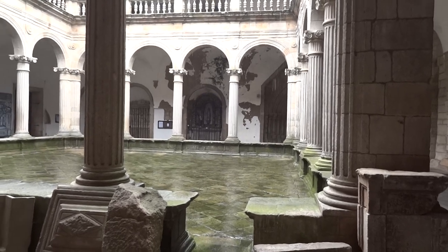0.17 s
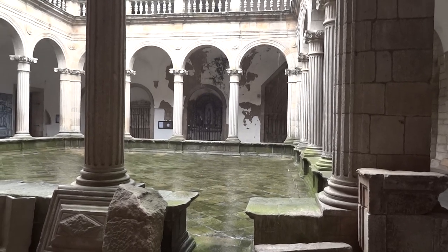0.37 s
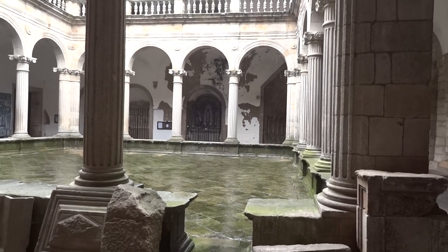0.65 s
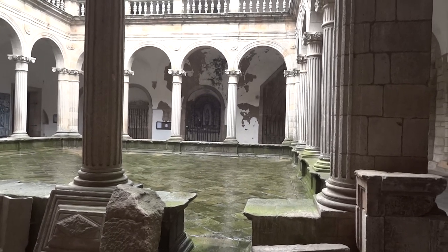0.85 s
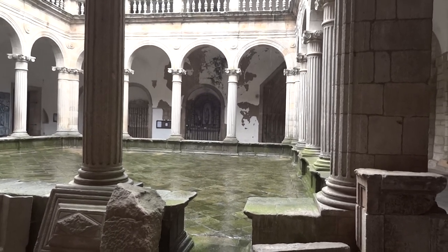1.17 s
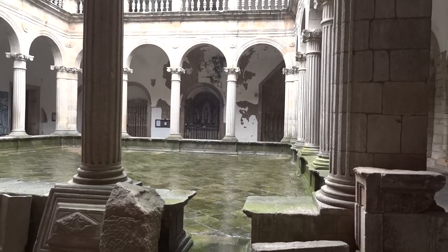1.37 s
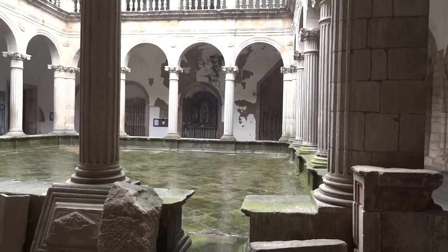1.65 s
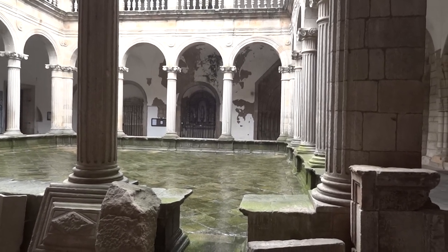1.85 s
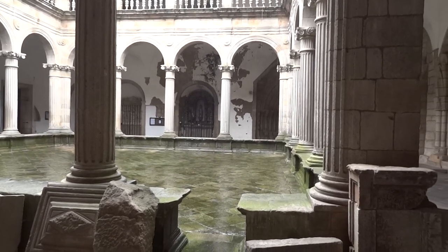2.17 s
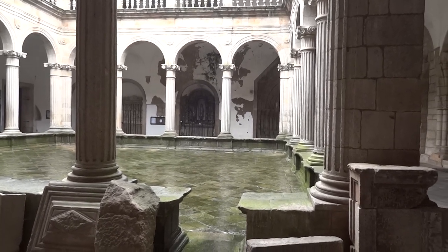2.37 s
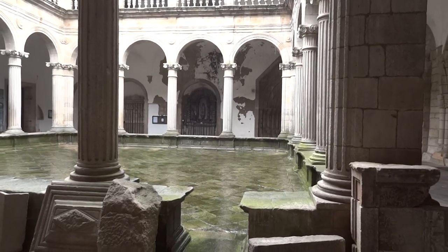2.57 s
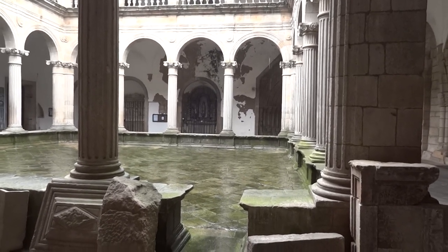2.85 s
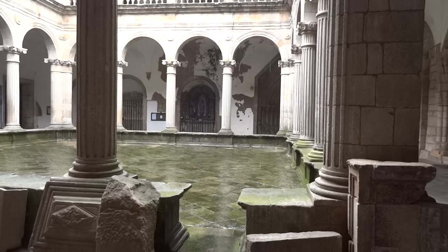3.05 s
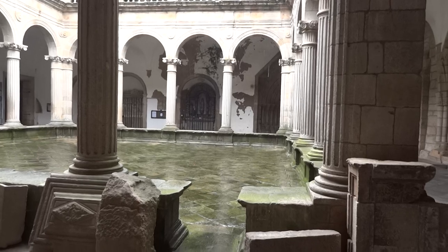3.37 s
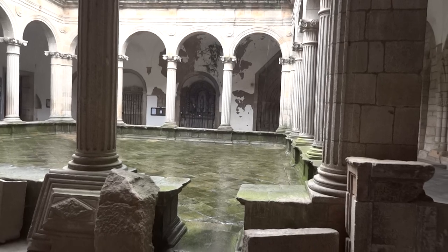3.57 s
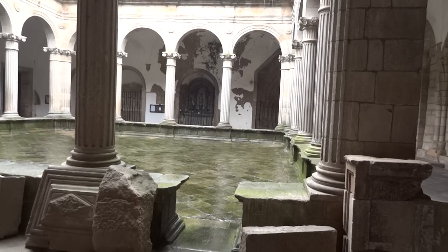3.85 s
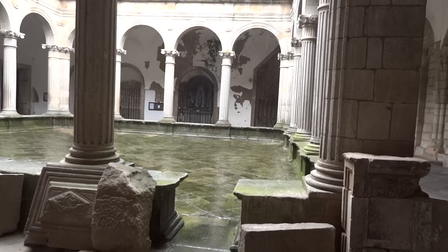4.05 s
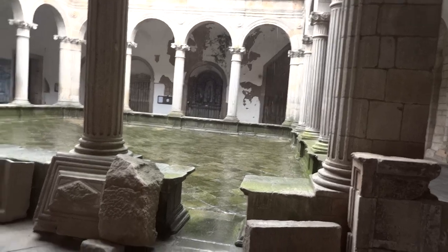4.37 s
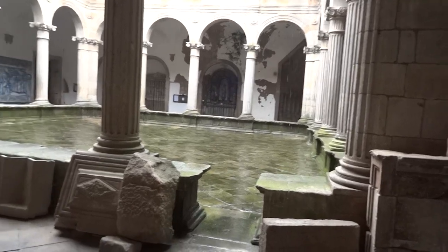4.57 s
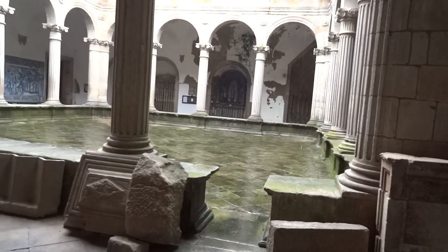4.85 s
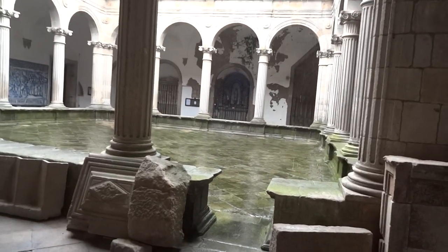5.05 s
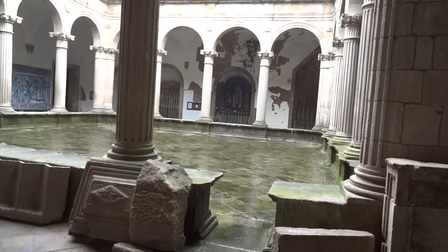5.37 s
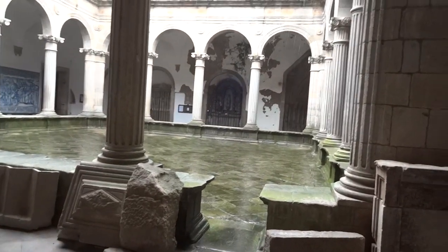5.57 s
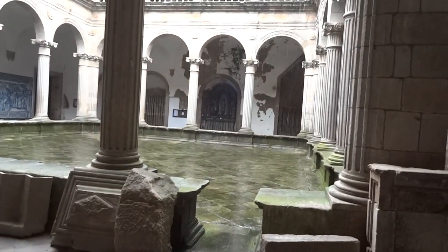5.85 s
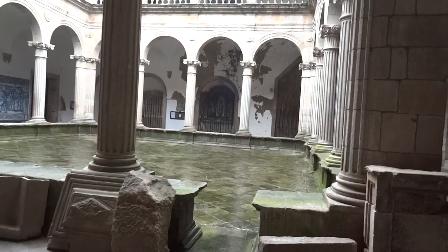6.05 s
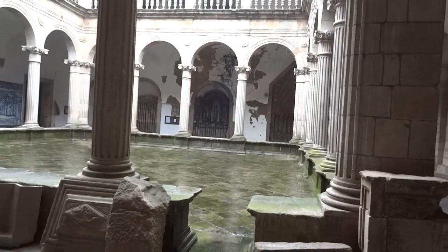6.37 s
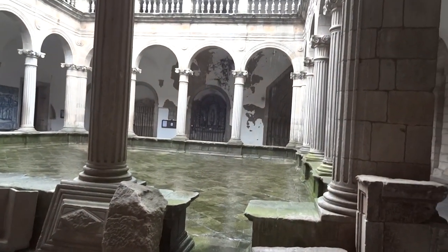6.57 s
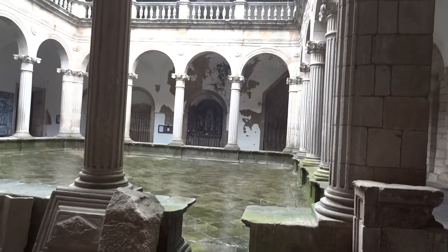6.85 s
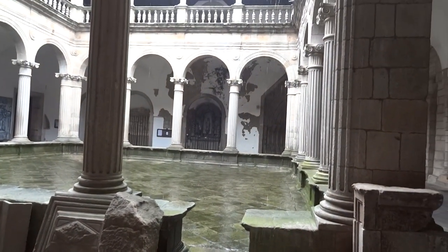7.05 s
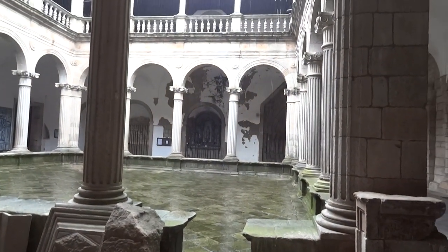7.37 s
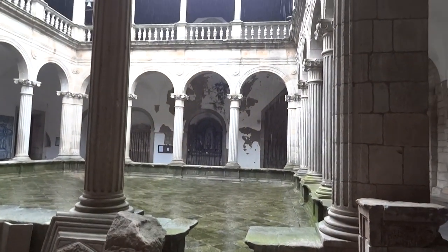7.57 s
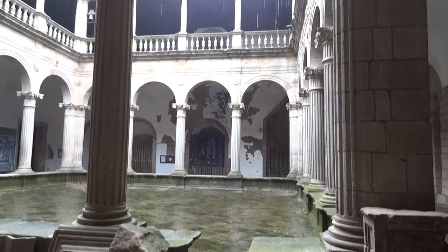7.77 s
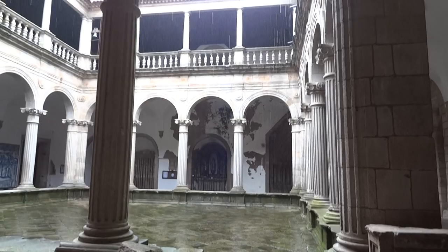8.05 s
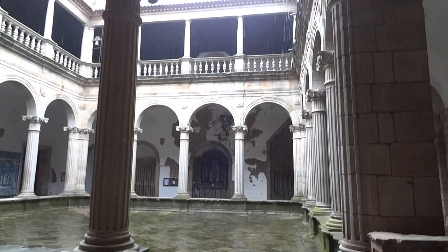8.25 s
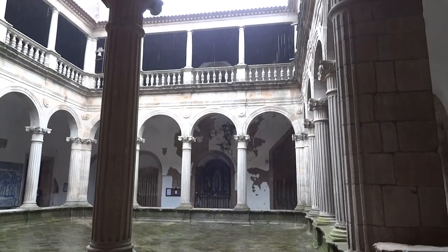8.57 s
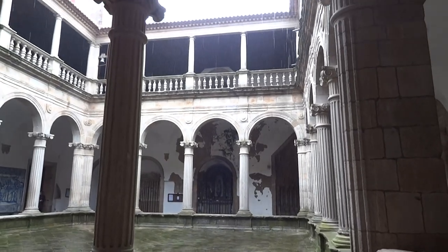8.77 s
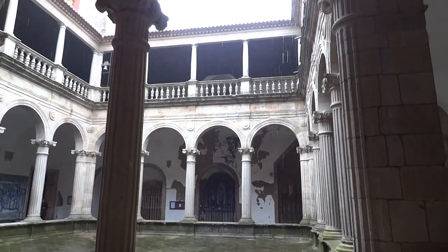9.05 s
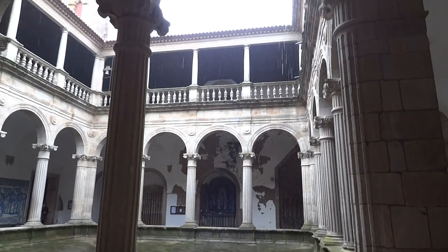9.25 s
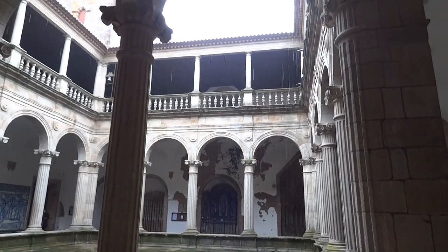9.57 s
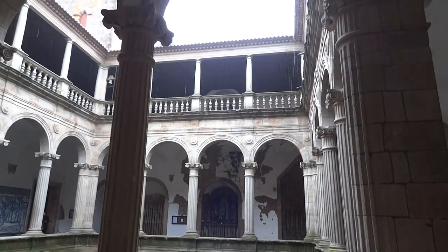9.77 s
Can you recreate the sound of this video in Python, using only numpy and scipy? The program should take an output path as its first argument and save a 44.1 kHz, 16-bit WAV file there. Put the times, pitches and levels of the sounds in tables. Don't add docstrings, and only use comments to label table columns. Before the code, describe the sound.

Steady rain on wet stone and shallow water, heard from under an arcade in a walled courtyard. Countless fine drops blur into a bright, even hiss that wavers slightly. Close drops tick and plop irregularly above it, and run-off from the eaves lands in short splashes, thickest in the first two seconds. A very quiet low hum lies beneath, with a few soft bumps on the handheld microphone midway.

```python
import sys
import numpy as np
from scipy import signal
from scipy.fft import rfft, irfft
from scipy.io import wavfile
from scipy.ndimage import map_coordinates

SR = 44100
rng = np.random.default_rng(int(sys.argv[2]) if len(sys.argv) > 2 else 0)


def wav_out(sig):
    wavfile.write(sys.argv[1], SR, np.round(np.clip(np.atleast_2d(sig).T, -1, 1) * 32767).astype(np.int16))


def volts_from_decibels(level):
    exponent = np.asarray(level, float) / 20
    return 10 ** exponent


N = 436590


def unit(x):
    return x / np.sqrt(np.mean(x ** 2) + 1e-20)


def along(points, hz):
    f, v = np.transpose(points)
    return np.interp(np.log(hz + 1), np.log(f + 1), v)


def coloured(x, gain_db):
    size = 4096
    log_gain = np.log(volts_from_decibels(gain_db(np.fft.rfftfreq(size, 1 / SR))) + 1e-6)
    cepstrum = irfft(log_gain, size)
    cepstrum[1:size // 2] *= 2
    cepstrum[size // 2 + 1:] = 0
    response = irfft(np.exp(rfft(cepstrum)), size)
    return signal.oaconvolve(x, response)[:N]


def wobble(rate):
    knots = rng.standard_normal(int(N * rate / SR) + 4)
    return map_coordinates(knots, [np.arange(N) * rate / SR])


def curves(rows):
    s, *cols = np.transpose(rows)
    return [np.interp(np.arange(N) / SR, s, c) for c in cols]


def swells(rows, half_s):
    s, rise_db = np.transpose(rows)
    t = np.arange(0, N + 256, 256) / SR
    bells = np.exp(-((t - s[:, None]) / half_s) ** 2)
    return np.interp(np.arange(N) / SR, t, rise_db @ bells)


def surges():
    # time [s], strength [dB], coarseness [dB], more big drops when high.
    shower = [(0, 0.5, -1.7), (.2, 0, 1), (.55, -.5, -1), (.95, -0.2, 0.45), (1.3, 0.35, -0.14),
              (1.9, 0, 0.65), (2.3, 0, -1.7), (2.62, 0, 1), (2.98, -1.5, 0.15), (3.45, 0.5, 0.59),
              (4.3, 0, .5), (4.65, -1, -0.39), (5.25, 0.5, -1.3), (6.8, -1.2, 0.74), (7.6, 0.2, -0.24),
              (8.25, -1.5, -0.43), (8.9, 0, 0.9), (9.9, -0.5, 1.8)]
    # time [s], strength change [dB].
    puffs = [(.3, -0.5), (.8, 0.7), (.99, -1.5), (1.5, 0.5), (2.1, 0.5), (2.25, -1.2), (2.4, -1.2),
             (3.12, .8), (3.4, 0), (3.95, -3), (4.1, -0.5), (4.44, -1.5), (4.84, 1), (5.03, -0.5), (5.7, 0),
             (5.93, -0.5), (6.2, 1.5), (6.35, -0.5), (6.5, 2.5), (7.2, -1), (7.4, 0.5), (7.57, -2),
             (7.77, -1), (7.92, 1), (8.3, 0.5), (8.42, 2), (8.63, -1.5), (9.12, -2.5), (9.3, -1),
             (9.45, 1.5)]
    # time [s], rise [dB].
    spray = [(.03, 2), (.22, 0.5), (.41, 1.5), (1.08, 1), (1.29, 1.5), (1.89, 0), (2.07, 1.5), (2.34, 1),
             (2.59, 1), (3.3, 1), (3.52, 0.5), (3.65, -3), (3.76, 1), (3.89, 1.5), (4.25, 0.5), (4.52, 1),
             (5.17, 2), (5.79, 0.5), (6.3, 1), (6.65, 2), (6.97, 1), (7.07, 1), (7.4, 1.5), (7.57, 3),
             (7.9, 1.5), (8.38, 2), (8.7, -2), (8.99, 0), (9.4, 0.5), (9.61, 0.5)]
    # level [dB], dB per strength dB, dB per coarseness dB.
    answer = [
        (-37, 0.67, 1.43),
        (-29.5, 1.25, 0.85),
        (-27.5, 2.5, 0.4),
        (-29, 0.96, 0.6),
        (-32.5, 0.34, 0.2),
    ]
    flurries_per_s = 18
    strength_db, coarse_db = curves(shower)
    strength_db = strength_db + 0.44 * swells(puffs, half_s=0.064)
    strength_db = strength_db + 0.07 * wobble(flurries_per_s)
    levels = []
    for db, per_strength, per_coarse in answer:
        flurry_db = 0.29 * wobble(flurries_per_s)
        levels.append(db + per_strength * strength_db + per_coarse * coarse_db + flurry_db)
    levels[-1] = levels[-1] + 1.55 * swells(spray, half_s=0.041)
    return levels


def impacts(scatter_db):
    per_second = 2500
    count = per_second * N // SR
    rank = np.minimum(rng.exponential(size=count), 4.5)
    size = volts_from_decibels(scatter_db * rank) * rng.choice([-1, 1], count)
    return unit(np.bincount(rng.integers(0, N, count), size, N))


def rain():
    # splash centre [Hz], spread [octaves], size scatter [dB],
    # share heard straight [0-1], gain [dB].
    sizes = [
        (1412, 0.36, -0.5, 0.23, 2.28),
        (2608, 0.23, 1.5, 0.27, 1),
        (4347, 0.25, 4, 0.3, 0.78),
        (7140, 0.23, 4.5, 0.46, 0.5),
        (11800, 0.3, 4.5, 0.38, 1.74),
    ]
    # frequency [Hz], density [dB per Hz].
    splash = [(400, -64), (700, -21.5), (1300, -14.5), (2500, -2), (4200, 4.5), (8000, -2.5), (13000, -8.5),
              (15000, -11), (16500, -17)]
    shared = impacts(scatter_db=4.0)
    clump = wobble(rate=30)
    ahead, sideways = np.zeros(N), np.zeros(N)
    for level_db, (centre_hz, octaves, scatter_db, straight, gain_db) in zip(surges(), sizes):

        def band(hz):
            octaves_off = np.abs(np.log2(np.clip(hz, 1, 12000) / centre_hz))
            return along(splash, hz) - 6 * (octaves_off / (2 * octaves)) ** 2.66

        hits = unit(impacts(scatter_db) + 0.6 * shared) * volts_from_decibels(0.51 * clump + 1.34 * wobble(rate=60))
        blur = rng.standard_normal(N) * volts_from_decibels(0.11 * wobble(rate=45))
        mix = np.sqrt(straight) * hits + np.sqrt(1 - straight) * blur
        ahead += volts_from_decibels(level_db + gain_db) * unit(coloured(mix, band))
        sideways += volts_from_decibels(level_db) * unit(coloured(blur[::-1] + 0.4 * impacts(scatter_db), band))
    return ahead, sideways


def hum():
    # frequency [Hz], density [dB per Hz].
    hum_colour = [(12, -64), (20, -14.5), (109, -3.5), (524, -3.5), (901, -3), (1300, -8), (1690, -38),
                  (2860, -120)]
    noise = coloured(rng.standard_normal(N), lambda hz: along(hum_colour, hz))
    return volts_from_decibels(-46.5 + 0.13 * wobble(rate=4.0)) * unit(noise)


def slops():
    # start [s], level [dB], centre [Hz], width [Hz], time to fall 60 dB [s].
    slugs = [(0.099, -30, 4200, 2400, 1.2), (0.159, -32, 1720, 600, 0.72), (.36, -32, 2100, 600, .4),
             (1.08, -24.5, 6760, 3000, 2.4), (1.09, -27, 2500, 900, .6), (1.165, -23, 2600, 450, 0.19),
             (1.27, -35, 11500, 2800, .6), (1.39, -24, 5000, 2500, .5), (1.57, -26.5, 2700, 900, 1),
             (1.798, -22, 4160, 1400, 2.1), (2.57, -38, 1600, 900, 1), (3.4, -32, 5500, 4500, 1.8),
             (3.66, -27, 7300, 2400, 1.3), (4.05, -29, 4300, 1200, .9), (4.18, -29, 3030, 1500, 1.4),
             (5.12, -27, 6500, 3000, .6), (5.57, -28, 3580, 900, .6), (6.45, -33, 2100, 1400, .5),
             (7.66, -29, 3300, 1500, 0.55), (7.9, -27.5, 2500, 1200, .5), (8.696, -26, 4500, 3300, .7),
             (8.8, -28, 3900, 2800, 1.8), (8.97, -30.5, 1910, 800, 1), (9.37, -32, 1900, 1290, 1.3)]
    out, t = np.zeros(N + SR), np.arange(SR // 2) / SR
    for s, db, hz, width_hz, t60 in slugs:
        grains = rng.standard_normal(len(t)) * volts_from_decibels(3.0 * rng.standard_normal(len(t)))
        limits = [hz - width_hz / 2, hz + width_hz / 2]
        sos = signal.butter(2, limits, "band", fs=SR, output="sos")
        swell = volts_from_decibels(db - 60 * t / t60) * (1 - np.exp(-t / 0.0023))
        out[round(s * SR):][:len(t)] += swell * unit(signal.sosfilt(sos, grains))
    return out[:N]


def all_drops():
    # time [s], splash [dB], pitch [Hz], tick [dB].
    puddles = [(.1004, -7, 4600, -26), (.1495, -7, 4800, -27), (.1507, -5, 4100, -38),
               (.172, -7, 4300, -15), (.1945, -8, 4400, -22), (.6838, -8, 4700, -12),
               (1.0025, -8, 3800, -16), (1.2533, -7, 3400, -12), (1.8005, -7, 4200, -27),
               (1.8026, -7, 4100, -28), (1.8249, -5, 4400, -26), (1.8528, -6, 3700, -33),
               (1.9842, -8, 5000, -16), (2.3907, -7, 3200, -15), (2.5188, -7, 4700, -13),
               (3.4482, -8, 4100, -11), (3.5467, -6, 4200, -17), (3.605, -8, 7900, -12),
               (3.6652, -6, 4700, -18), (4.8518, -6, 5500, -22), (5.0806, -9, 3800, -20),
               (5.3116, -8, 5000, -14), (5.5729, -6, 3700, -30), (6.0362, -5, 4200, -22),
               (7.1645, -5, 4600, -15), (7.631, -7, 3700, -23), (7.6571, -7, 4300, -17),
               (8.6957, -8, 4000, -21), (8.708, -8, 4400, -23), (8.9506, -9, 4200, -21)]
    # time [s], tick [dB].
    ticks = [(.2176, -12), (.4063, -11), (.7399, -13), (1.2125, -10), (1.2384, -12), (1.2809, -12),
             (1.3055, -11), (1.7278, -12), (2.3535, -9), (3.2529, -11), (3.2709, -11), (3.5102, -13),
             (3.8907, -10), (4.4828, -11), (5.7719, -12), (6.1332, -13), (6.3062, -13), (6.5862, -13),
             (6.8231, -12), (6.9842, -12), (7.0563, -11), (7.1207, -12), (7.3864, -11), (7.3961, -13),
             (7.5324, -13), (7.5607, -11), (8.3396, -13), (8.4095, -13), (8.8995, -13), (9.5706, -11)]

    def pitch(z):
        return np.clip(4070 * np.exp(0.3 * z), 2500, 8000)

    stone = []
    for (s, tick_db), (a, b) in zip(ticks, rng.standard_normal((len(ticks), 2))):
        stone.append((s, tick_db - 4.5 + 3 * a, pitch(b), tick_db))
    lesser_per_s = 8
    count = round(lesser_per_s * N / SR)
    a, b, c = rng.standard_normal((count, 3)).T
    when = (np.arange(count) + rng.uniform(size=count)) / lesser_per_s * 0.99
    lesser = zip(when + 0.002, -11 - 3 * abs(a), pitch(b), -16 - 4 * abs(c))
    return [*puddles, *stone, *lesser]


def near_drops():
    out, t = np.zeros(N + SR), np.arange(256) / SR
    drops = all_drops()
    chance = rng.standard_normal((len(drops), 3))

    def burst(hz, cycles):
        age = t * hz / cycles
        return np.sin(2 * np.pi * hz * t) * age * np.exp(1 - age)

    for (s, db, hz, tick_db), (sign, late, weak) in zip(drops, chance):
        drop = volts_from_decibels(db - 1) * burst(hz, 0.68) + volts_from_decibels(tick_db) * burst(11500, 1.1)
        start = round(s * SR - 0.7 * SR / hz)
        echo = start + round((0.0013 + 0.0002 * late) * SR)
        out[start:][:len(t)] += np.sign(sign) * drop
        out[echo:][:len(t)] += volts_from_decibels(-11 + 2.5 * weak) * drop
    return out[:N]


def walls(x):
    # frequency [Hz], time to fall 60 dB [s].
    decay = [(300, 1), (3000, 0.99), (12000, 1)]
    hz, t, z = signal.stft(rng.standard_normal(SR), SR, nperseg=256)
    fade = volts_from_decibels(-60 * t / along(decay, hz)[:, None])
    tail = signal.istft(z * fade, SR, nperseg=256)[1]
    delayed = np.pad(x, (200, 0))
    return signal.oaconvolve(delayed, tail / np.linalg.norm(tail))[:N]


def bumps():
    # start [s], level [dB], ring [Hz], time to fall 60 dB [s], puff share [ratio].
    knocks = [
        (4.357, -30, 146, .08, 1.3),
        (4.403, -33, 330, .06, 1.5),
        (5.033, -24, 830, .035, .05),
    ]
    out, t = np.zeros(N + SR), np.arange(SR // 4) / SR
    sos = signal.butter(2, [260, 470], "band", fs=SR, output="sos")
    for s, db, hz, t60, share in knocks:
        puff = signal.sosfilt(sos, rng.standard_normal(len(t)))
        ring = np.sin(2 * np.pi * hz * t) + share * unit(puff)
        out[round(s * SR):][:len(t)] += volts_from_decibels(db - 2 - 60 * t / t60) * (1 - np.exp(-t / 0.0053)) * ring
    return out[:N]


def scene():
    # frequency [Hz], side minus mid [dB].
    width = [(60, -18), (110, -17), (200, -11), (380, -10.5), (700, -10.5), (1290, -17), (2380, -16.5),
             (4400, -13.5), (8120, -15), (15000, -15)]
    ahead, sideways = rain()
    near = near_drops()
    mid = ahead + near + volts_from_decibels(-4.5) * walls(near) + bumps() + hum() + slops()
    side = coloured(sideways + hum(), lambda hz: along(width, hz) - 6 * (hz / 15000) ** 22)
    return np.array([mid + side, mid - side]) * volts_from_decibels([[-0.05], [0.05]])


def low_pass(x):
    return signal.sosfilt(signal.butter(12, 15970, fs=SR, output="sos"), x)


def record(dry):
    top_hz = 15740
    hz = np.fft.rfftfreq(N + SR, 1 / SR)
    edge_db = np.interp(hz - top_hz, [-15, 25, 130, 170], [0, -21, -24, -90])
    kept = irfft(rfft(dry, N + SR) * volts_from_decibels(edge_db), N + SR)[:, :N]
    return low_pass(kept)


dry = scene()
out = record(dry)
wav_out(out)
```